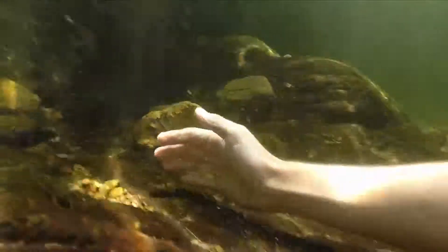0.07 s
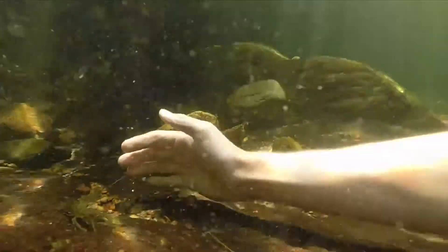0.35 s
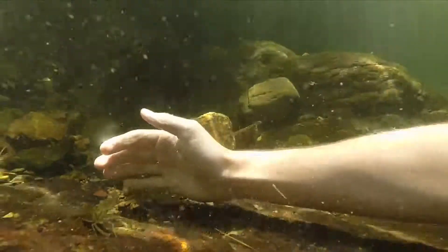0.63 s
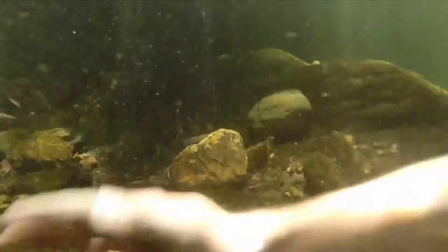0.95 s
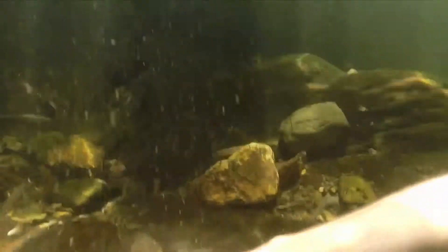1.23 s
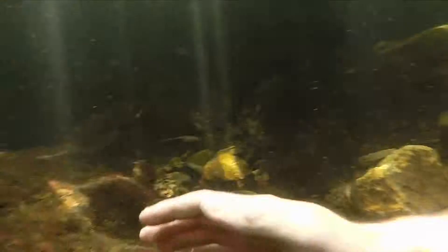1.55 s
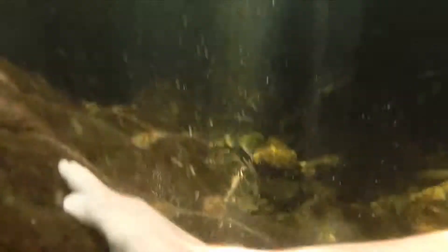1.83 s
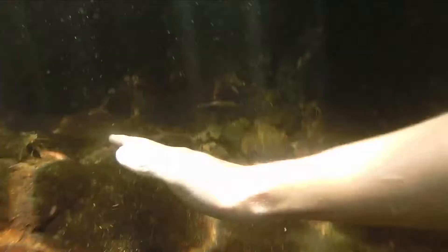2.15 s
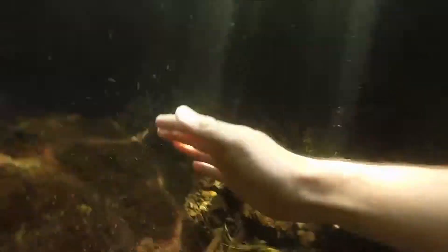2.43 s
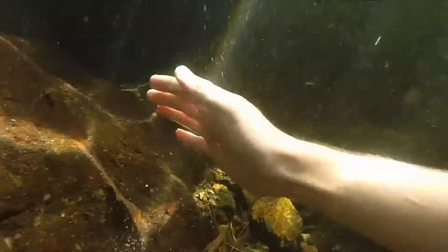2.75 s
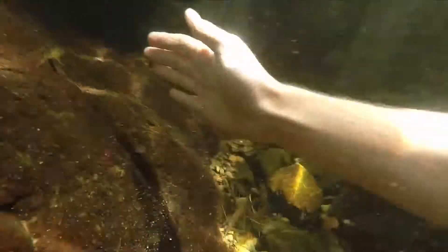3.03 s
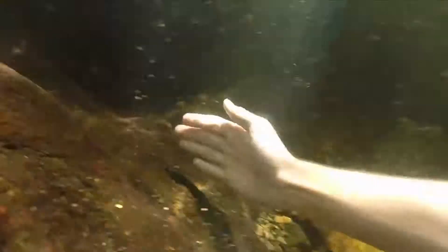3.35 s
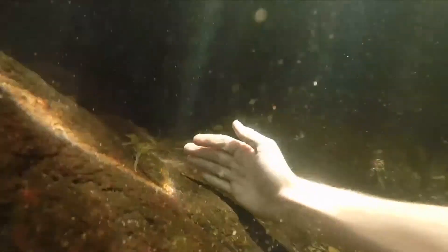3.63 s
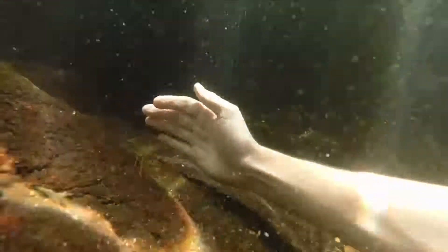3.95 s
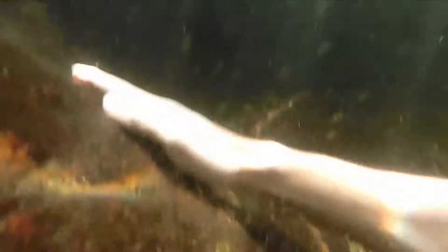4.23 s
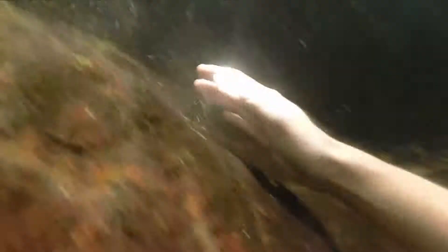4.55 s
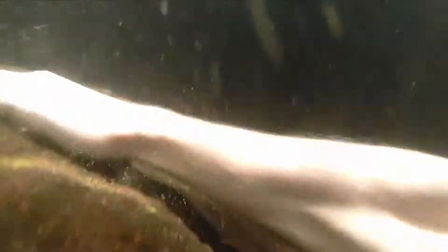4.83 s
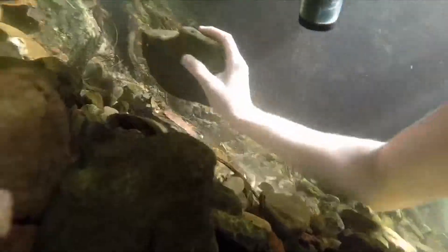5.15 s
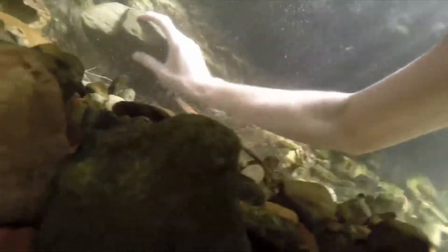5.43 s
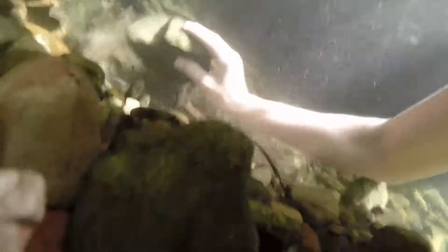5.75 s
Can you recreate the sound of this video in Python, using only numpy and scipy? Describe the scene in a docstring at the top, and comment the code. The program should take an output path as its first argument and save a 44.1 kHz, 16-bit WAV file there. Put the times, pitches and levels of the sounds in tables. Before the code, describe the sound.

A muffled underwater rumble and murmur sways throughout under a faint hiss, heard from inside a waterproof case that gives nearly everything a hollow ring. A run of soft, dull ticks slows over the first half second. From 0.6 to 1.5 seconds tiny bubbles crackle, grit clicks on the shell and the current swells, with a thump at 1 second. A few small bubbles plink around 1.6 seconds, then a strong, deep thump lands at 1.8. Fizz builds from 2.3 seconds and hits suddenly at 2.7, thick with sharp pops, fading by 3.4. Low thumps with brief rubs follow at 4.1 and 4.8 seconds. From 5 seconds the case is scraped and knocked repeatedly, and the hardest knock, at about 5.3, overloads the microphone. Smaller knocks and dull pops trail off into swelling water and a thin, faint hiss, ending near 5.9 seconds.

```python
"""Water sways and murmurs around a waterproof camera case, under a fine hiss and a run of soft ticks.
The case is carried through a creek after a swimmer's hand: clouds of tiny bubbles fizz past, grit ticks
on the shell, things slide over it, surges thump against it and larger bubbles plink. Near the end it is
rubbed and knocked, once hard enough to overload the microphone. The hollow ring of the case colours
nearly everything."""
import sys
import numpy as np
from scipy import signal
from scipy.fft import rfft, irfft
from scipy.io import wavfile
from scipy.ndimage import uniform_filter1d

SR = 44100
rng = np.random.default_rng(int(sys.argv[2]) if len(sys.argv) > 2 else 0)


def unload_wav(signal):
    """Save mono or channel-first audio to the path in sys.argv[1] as 16-bit WAV at rate SR, clipped to [-1, 1]."""
    wavfile.write(
        sys.argv[1],
        SR,
        np.round(np.clip(np.atleast_2d(signal).T, -1, 1) * 32767).astype(np.int16),
    )


N = 259305
TIME = np.arange(N) / SR
HZ = np.fft.rfftfreq(16384, 1 / SR)


def amp(db):
    """Decibels to gain."""
    return 10 ** (np.asarray(db) / 20)


def unit_rms(x):
    """Scales a signal to an rms of 1."""
    return x / np.sqrt(np.mean(x ** 2) + 1e-20)


def add(mix, start_s, sound):
    """Drops a sound into the mix."""
    part = mix[max(round(start_s * SR), 0):][:len(sound)]
    part += sound[:len(part)]


def fader(rows, outside_db=None):
    """Gain at every sample, riding through points of time and dB."""
    return amp(np.interp(TIME, *np.transpose(rows), left=outside_db, right=outside_db))


def eq_curve(points):
    """A full EQ curve in dB, drawn through a few points."""
    hz, db = np.transpose(points)
    return np.interp(np.log(HZ + 1), np.log(hz), db)


def hump(centre_hz, rise, fall):
    """Spectrum of a contact in dB: a rounded top, with skirts in dB per octave."""
    ratio = (HZ + 1) / centre_hz
    return -.5 * (rise * np.log2(1 + ratio ** -2) + fall * np.log2(1 + ratio ** 2))


def resonances(modes):
    """Gain in dB of a set of peaks and dips."""
    db = 0
    for hz, width, peak_db in modes:
        detuning = ((HZ ** 2 - hz ** 2) / ((HZ + 1) * width)) ** 2
        db += np.sign(peak_db) * 10 * np.log10((detuning + amp(abs(peak_db)) ** 2) / (detuning + 1))
    return db


def grains(size, per_s, spread_db):
    """Random clicks of either sign, mostly small, a few large."""
    chance, strength, sign = rng.random((3, size))
    strength = np.minimum(-np.log(1 - strength), 4)
    return unit_rms((chance < per_s / SR) * np.sign(sign - .5) * amp(spread_db * strength))


def drift(per_s):
    """A random wobble with an rms of 1."""
    knots = np.arange(0, TIME[-1] + 1, 1 / per_s)
    return unit_rms(np.interp(TIME, knots, rng.standard_normal(len(knots))))


# The hollow voice of the case. Each row: frequency in Hz, width in Hz, boost or dead-spot cut in dB.
CASE_MODES = [(571, 18.4, 19), (658.4, 29, 14), (730, 85, -8), (1376, 37, 6), (1650, 190, 4),
              (2150, 1200, -5.5), (2600, 190, 7.5), (3000, 440, 5), (3420, 250, 4), (4200, 170, -1.5),
              (6380, 160, 5.5), (7470, 2200, -6), (8020, 1000, 7), (11400, 120, 6.5)]

def case_ring(spectrum_db, share):
    """The case answers a push of this spectrum; share sets how strongly its modes are excited."""
    db = spectrum_db + share * resonances(CASE_MODES)
    # minimum phase, so the ring follows the push
    cepstrum = irfft(np.log(amp(np.maximum(db - db.max(), -100))))
    cepstrum[0] = 0
    half = len(HZ) - 1
    return irfft(np.exp(rfft(2 * cepstrum[:half], 2 * half)))[:half]


def through_case(drive, eq, share=1):
    """A steady drive, shaped by an EQ and the ring of the case; rms 1."""
    return unit_rms(signal.fftconvolve(drive, case_ring(eq_curve(eq), share))[:len(drive)])


def strike(spectrum_db, chatter, chatter_s, share=1):
    """One contact, followed by a brief chatter, rings the case; peak 1."""
    size = SR // 20
    t = np.arange(size) / SR
    force = chatter * unit_rms(rng.standard_normal(size) * np.exp(-t / chatter_s)) / np.sqrt(size)
    force[0] -= 1  # the contact itself
    sound = signal.fftconvolve(force, case_ring(spectrum_db, share))
    return sound / abs(sound).max()


# The deep rumble of the current. Each row: frequency in Hz, EQ gain in dB.
SWAY_EQ = [(8, -12.5), (20, 2.5), (35, -1), (55, -7.5), (90, -21.5), (140, -32), (250, -46), (600, -88)]
# How hard the current pushes. Each row: time in seconds, strength in dB.
CURRENT_LEVELS = [(0, -47), (.2, -48), (.67, -54.5), (.76, -35.5), (1.15, -38.5), (1.42, -49.5), (1.9, -41),
                  (2.4, -45.5), (2.62, -41), (2.95, -42), (3.2, -44), (3.8, -51.5), (4.35, -41.5),
                  (4.65, -46), (5.0, -35.5), (5.36, -54), (5.5, -38.5), (5.88, -42.5)]

def sway(ceiling_db=-33):
    """Eddies rock the case, harder around each surge."""
    rumble = through_case(rng.standard_normal(N), SWAY_EQ)
    rumble /= np.sqrt(uniform_filter1d(rumble ** 2, size=4000) + .109)  # evens out the eddies
    strength = np.hypot(fader(CURRENT_LEVELS), wakes())
    return rumble * np.minimum(strength, amp(ceiling_db))


# The dark wash of the creek. Each row: frequency in Hz, EQ gain in dB.
MURMUR_EQ = [(40, 7.5), (120, 3.5), (250, 1), (450, -1.5), (900, -5.5), (1500, -8), (2400, -14.5),
             (3200, -18), (6000, -26), (14000, -34.5)]
# Its swells. Each row: time in seconds, level in dB before trim.
MURMUR_LEVELS = [(0, -57), (.68, -60.5), (.8, -52.5), (1.2, -59.5), (1.85, -54), (2.2, -60), (2.5, -58),
                 (3.2, -56), (3.4, -59), (4.95, -59.5), (5.45, -51), (5.6, -56.5), (5.88, -53)]

def murmur(trim_db=2, patchy_db=3):
    """The creek's countless small splashes murmur through the case."""
    splashes = rng.standard_normal(N) + .47 * grains(N, per_s=380, spread_db=2)
    splashes *= amp(patchy_db * drift(per_s=35))
    return through_case(splashes, MURMUR_EQ, share=.63) * fader(MURMUR_LEVELS) * amp(trim_db)


# A fine bed of hiss. Each row: frequency in Hz, EQ gain in dB.
HISS_EQ = [(500, -1.5), (2000, 4.5), (3500, 2.5), (6000, -1.5), (9000, -8.5), (14000, -17.5)]
# It holds, then fades near the end. Each row: time in seconds, level in dB.
HISS_LEVELS = [(0, -70), (2.1, -68.5), (3.6, -67), (4.4, -69.5), (5.0, -69.5), (5.6, -83)]

def far_bubbles():
    """Distant bubbles blur into a hiss that barely rings the case."""
    return fader(HISS_LEVELS) * through_case(rng.standard_normal(N), HISS_EQ, share=.193)


def ticks(peak_db=-47.5, count=9, gap_s=.0572, lag_s=.0011, slowing=1.58):
    """Soft, dull ticks start at a near-steady pace, then slow down."""
    out, start = np.zeros(N), .0188
    dull = hump(1360, rise=29, fall=47)
    for k in range(count):
        add(out, start, amp(peak_db) * strike(dull, chatter=.68, chatter_s=.0032, share=.37))
        start += gap_s + lag_s * slowing ** k
    return out


def bubble_cloud(levels, eq, per_s, spread_db, clump_db):
    """Tiny bubbles burst on the shell in clumps."""
    bursts = grains(N, per_s, spread_db) * amp(clump_db * drift(per_s=120))
    return through_case(bursts, eq, share=1.15) * fader(levels, outside_db=-100)


# The bright prickle of a passing cloud. Each row: frequency in Hz, EQ gain in dB.
PASSING_EQ = [(300, -19.5), (1400, 4), (2200, -1), (2600, 4), (3500, 4.5), (3900, 7), (4250, -26),
              (5000, 2.5), (6600, 2), (7300, -11), (11000, -18.5), (14000, -28)]
# Its way past the case. Each row: time in seconds, level in dB.
PASSING_LEVELS = [(.55, -71), (.58, -62.5), (.68, -57.5), (.9, -63.5), (1.08, -54.5), (1.25, -68.5),
                  (1.39, -61), (1.5, -70), (1.7, -70)]

def passing_cloud():
    """A sparse cloud of bubbles crackles as it drifts by."""
    return bubble_cloud(PASSING_LEVELS, PASSING_EQ, per_s=450, spread_db=3.8, clump_db=1.5)


def pop(tilt):
    """One sharp pop on the shell, brightened by tilt dB per octave."""
    colour = hump(5100, rise=11, fall=17.8) + tilt * np.log2((HZ + 1) / 3400)
    return strike(colour, chatter=1.3, chatter_s=.0018)


# Foreground pops. Each row: start in seconds, peak in dB before trim, tilt in dB per octave.
CLEAR_POPS = [(0.5939, -47, 1), (0.6704, -39.5, -7), (0.8954, -36, -7.5), (1.0645, -36.5, -5.5),
              (1.3783, -37, -1.5), (1.7134, -44, -3), (2.5735, -39.5, 3), (2.7033, -34.5, -6),
              (2.7574, -29, -7), (2.8519, -30, -0.5), (2.8828, -28, -4.5), (2.9562, -31, -6),
              (3.1542, -31.5, -7), (3.2026, -40, 0), (3.4331, -38, -4), (3.5134, -41.5, -2.5),
              (4.4677, -46.5, -4), (5.4196, -36, -10), (5.446, -42, -8), (5.4999, -34, -13)]
# Showers of lighter grit. Each row: start and length in seconds, pops a second,
# peak in dB before scatter, tilt in dB per octave.
GRIT_SHOWERS = [(0.599, 0.26, 16.4, -42, 3), (1.002, 0.49, 14.8, -42.5, -4.5), (2.721, .3, 18, -32.5, -3),
                (3.018, .4, 10, -39.5, -0.5), (5.05, .17, 23, -33.5, -4), (5.284, .12, 39, -36, -11)]

def grit(trim_db=2, scatter_db=3):
    """Grit and bubbles hit the shell, singly and in uneven showers."""
    out = np.zeros(N)
    for start, db, tilt in CLEAR_POPS:
        add(out, start, amp(db + trim_db) * pop(tilt))
    for start, length, per_s, db, tilt in GRIT_SHOWERS:
        for k, (late, weight) in enumerate(rng.random((16, 2))):
            delay = (k + late) / per_s
            sound = amp(db + scatter_db * (2 * weight - 1.5)) * pop(tilt)
            if delay < length:
                add(out, start + delay, sound)
    return out


# Things sliding over the case. Each row: start and length in seconds, rms level in dB, centre in Hz,
# treble roll-off in dB per octave.
SLIDES = [(0.714, 0.023, -44, 560, 19), (0.756, 0.22, -53, 288, 18), (1.049, 0.023, -37.5, 380, 20.5),
          (1.804, .024, -33, 497, 15.5), (1.536, 0.025, -48, 270, 13), (3.225, 0.036, -53, 600, 7.5),
          (4.133, 0.034, -41, 190, 8.5), (4.531, 0.083, -64.5, 4500, 15.5), (4.837, 0.026, -31, 198, 15.5),
          (4.844, 0.046, -51.5, 4800, 24.5), (4.943, .04, -62.5, 5500, 26), (5.045, 0.2, -37, 540, 13.5),
          (5.054, 0.012, -34, 1550, 32), (5.192, 0.02, -37, 2060, 21), (5.52, 0.033, -44, 500, 22)]

def rubs():
    """Stick and slip: a dense run of small catches rings the case, damped by the contact."""
    out = np.zeros(N)
    for start, length, db, hz, fall in SLIDES:
        size = round(length * SR)
        slips = grains(SR // 2, per_s=1800, spread_db=2.5)[:size] * signal.windows.tukey(size, .25)
        sound = signal.fftconvolve(slips, case_ring(hump(hz, rise=4, fall=fall), share=.55))
        sound *= np.sqrt(size / (np.sum(sound ** 2) + 1e-20))
        add(out, start, amp(db) * sound)
    return out


# Surges of water against the case. Each row: time in seconds, peak in dB, push and release in seconds.
SURGES = [(1.0586, -19, 0.0021, 0.004), (1.818, -6.5, 0.0018, 0.0034), (4.147, -14, 0.0034, 0.0033),
          (4.5633, -41.5, 0.0018, 0.0022), (4.8465, -17.5, .0032, 0.00077), (5.194, -25, 0.00069, 0.00077),
          (5.465, -31.5, 0.0012, 0.001), (5.535, -30, 0.0014, 0.0016)]

def thumps():
    """Pressure builds, swings to suction and relaxes."""
    out, t = np.zeros(N), np.arange(-SR // 20, SR // 20) / SR
    for at, db, push, release in SURGES:
        swing = -t * np.exp(-abs(t) / np.where(t < 0, push, release))
        add(out, at + t[0], amp(db) * swing / abs(swing).max())
    return out


def wakes(relative_db=-12, build_s=.04, fade_s=.049):
    """Strength of the eddies that build before each surge and die away after it."""
    strength = np.zeros(N)
    for at, db, _, _ in SURGES:
        slope_s = np.where(TIME < at, build_s, fade_s)
        strength += amp(db + relative_db) * np.exp(-abs(TIME - at) / slope_s)
    return strength


# Larger, single bubbles. Each row: start in seconds, level in dB before trim, opening pitch in Hz,
# seconds to decay by 60 dB, glide in octaves a second.
PLINKS = [(1.486, -48.5, 1045, 0.2, -2.5), (1.490, -41, 1440, 0.036, -10), (1.588, -49, 1014, 0.061, -20),
          (1.602, -47.5, 1480, 0.06, -15), (1.723, -37.5, 1620, 0.072, -11),
          (1.737, -44.5, 1140, 0.045, -16), (2.349, -25.5, 168, 0.04, -2), (2.484, -39, 605, 0.029, 2),
          (3.365, -47, 1023, 0.069, -0.5), (4.276, -33, 3210, 0.012, 4), (4.277, -35, 1800, 0.01, -1.5)]

def plinks(swell_s=.0012, trim_db=2):
    """Each bubble swells into a short, gliding ring."""
    out, t = np.zeros(N), np.arange(SR // 10) / SR
    for start, db, hz, t60, glide in PLINKS:
        envelope = (1 - np.exp(-t / swell_s)) * np.exp(-np.log(1000) * t / t60)
        phase = 2 * np.pi * np.cumsum(hz * 2 ** (glide * t)) / SR
        add(out, start, amp(db + trim_db) * envelope * np.sin(phase))
    return out


# Wall modes that only a knock wakes. Each row: frequency in Hz, width in Hz, boost in dB.
WALL_MODES = [(385, 130, 7), (832, 20, 8), (1037, 70, 7), (1340, 140, 4), (2665, 150, 7), (2944, 150, 7)]
# Blows on the case. Each row: start in seconds, peak in dB before overload, centre in Hz,
# treble roll-off as a filter order, freedom to ring from 0 to 1.
BLOWS = [(1.8105, -27.5, 5970, 3, 0), (1.8194, -22, 2730, 1.8, 0.7), (2.4217, -29.5, 650, 3, 1),
         (3.179, -34, 560, 4.5, 1), (4.134, -29, 300, 4, 0.5), (4.179, -39, 603, 3, 0.86),
         (5.060, -27.5, 860, 2.4, 1), (5.069, -23.5, 1590, 2, 0), (5.0828, -11.5, 1400, 3.4, 0.4),
         (5.138, -21, 1266, 2.3, 0), (5.1545, -17.5, 880, 1.9, 0.47), (5.2052, -23.5, 1052, 2.5, 0.6),
         (5.261, 5.5, 400, 2.4, 0.42), (5.2625, 2.5, 800, 1.2, 0.35), (5.2628, 0, 4700, 2.2, 1),
         (5.2809, -15, 2500, 1.5, 0.98), (5.313, -26.5, 1280, 1.9, 1), (5.3749, -18.5, 700, 2.4, 0.6),
         (5.528, -25, 243, 2.6, 0.3), (5.843, -31, 785, 1.7, 0.68)]

def knocks():
    """Water cushions each blow, and whatever stays pressed on the case damps its ring."""
    out, wall = np.zeros(N), resonances(WALL_MODES)
    cushion = hump(7000, rise=0, fall=9)
    for start, db, hz, order, freedom in BLOWS:
        colour = hump(hz, rise=8, fall=6 * order) + cushion + freedom * wall
        add(out, start, amp(db) * strike(colour, chatter=.7, chatter_s=.002, share=freedom))
    return out


# The fuller fizz of a head-on cloud. Each row: frequency in Hz, EQ gain in dB.
SWARM_EQ = [(150, 0.5), (500, -7.5), (800, -21), (1100, -2), (1600, -2), (2300, -5.5), (2800, -4),
            (4000, -10), (6300, -7.5), (7300, -13.5), (11000, -22), (14000, -27.5)]
# Its approach, sudden hit and fade. Each row: time in seconds, level in dB before trim.
SWARM_LEVELS = [(2.24, -66), (2.31, -55.5), (2.48, -60.5), (2.698, -65), (2.704, -44.5), (2.8, -46.5),
                (2.95, -49), (2.975, -55), (3.15, -58), (3.27, -57.5), (3.32, -68.5), (3.7, -71)]

def swarm(trim_db=1):
    """A dense cloud of bubbles runs straight into the case."""
    return amp(trim_db) * bubble_cloud(SWARM_LEVELS, SWARM_EQ, per_s=3400, spread_db=1.5, clump_db=3)


# An airy top end. Each row: frequency in Hz, EQ gain in dB.
THIN_EQ = [(1500, -2), (4000, 3), (8000, 2.5), (14000, 0)]

def thin_hiss(start_s=5.62, level_db=-66):
    """A thinner, brighter hiss cuts in at the end, with no ring from the case."""
    hiss = through_case(rng.standard_normal(N), THIN_EQ, share=0)
    return amp(level_db) * (TIME > start_s) * hiss


def scene():
    """Everything reaches the one microphone inside the case."""
    water = sway() + murmur() + thumps()
    fizz = far_bubbles() + thin_hiss() + passing_cloud() + swarm()
    return (water + fizz + knocks() + grit() + ticks() + plinks() + rubs())[None]


def record(dry, overload=.7, cutoff_hz=14400):
    """The microphone overloads on the hardest knock; a steep low-pass takes off the very top."""
    clipped = np.clip(dry, -overload, overload)
    lowpass = signal.firwin(401, cutoff_hz, window=("kaiser", 8), fs=SR)
    return signal.oaconvolve(clipped, lowpass[None], "same")


dry = scene()
out = record(dry)
unload_wav(out)
```